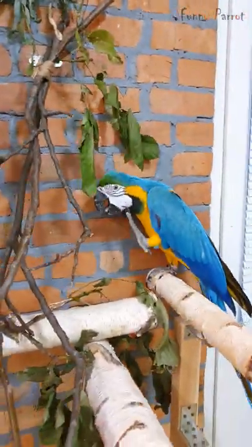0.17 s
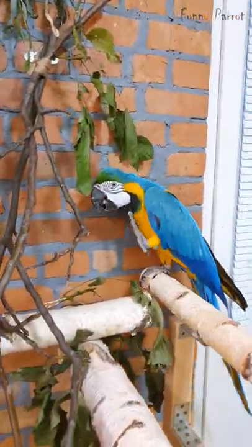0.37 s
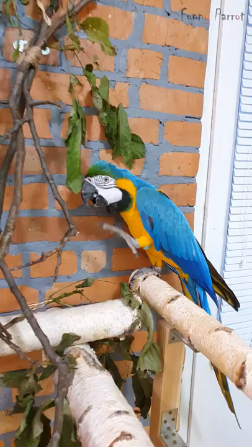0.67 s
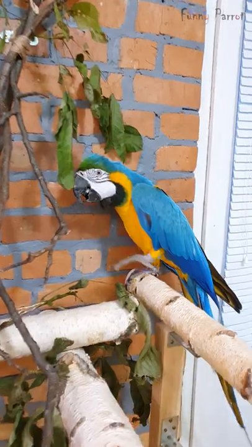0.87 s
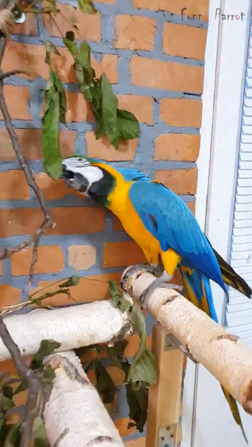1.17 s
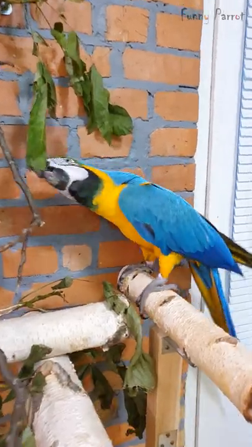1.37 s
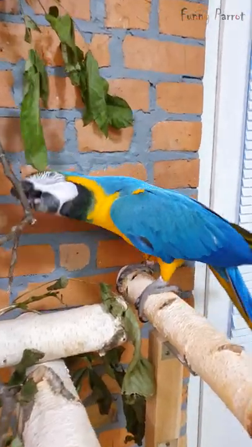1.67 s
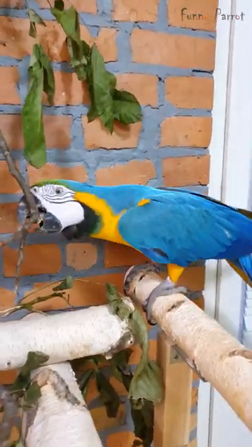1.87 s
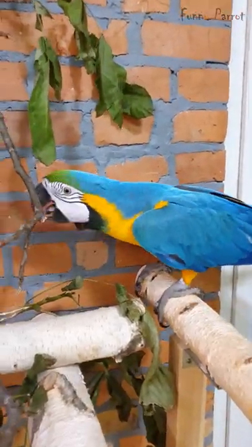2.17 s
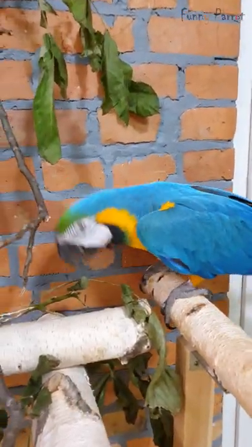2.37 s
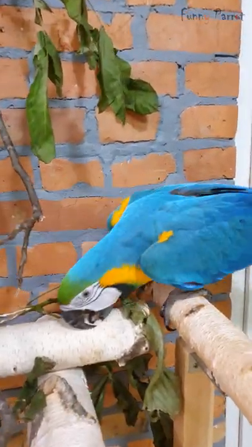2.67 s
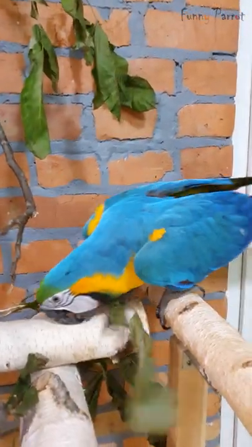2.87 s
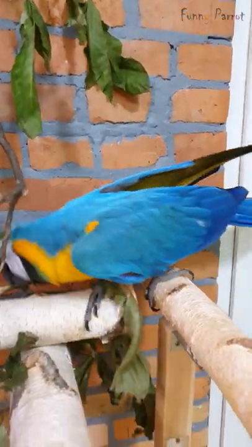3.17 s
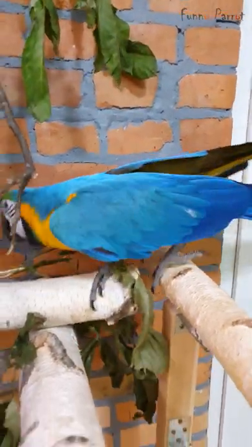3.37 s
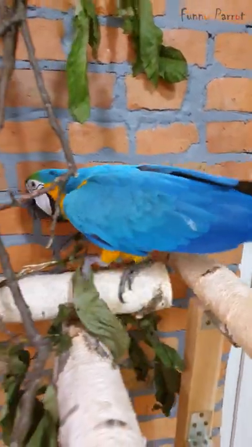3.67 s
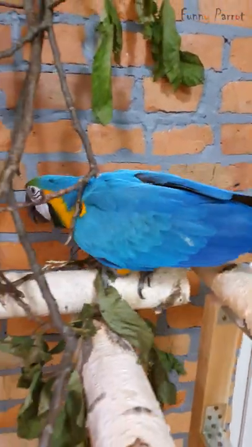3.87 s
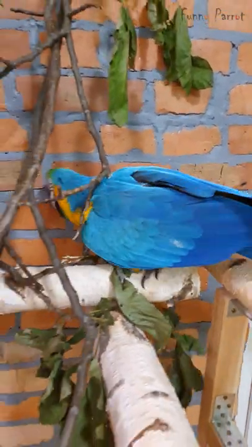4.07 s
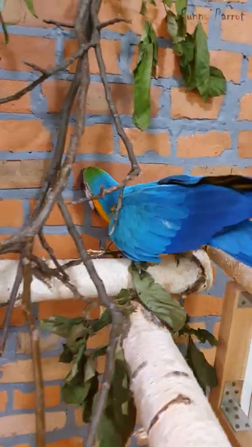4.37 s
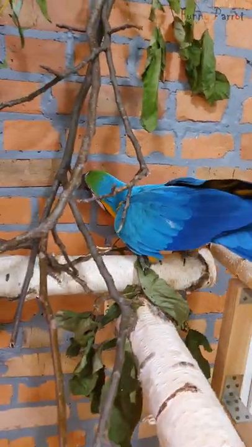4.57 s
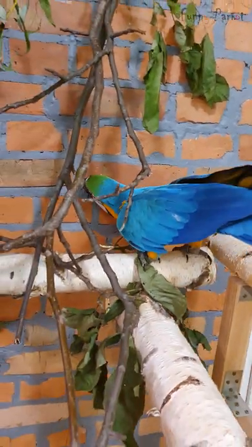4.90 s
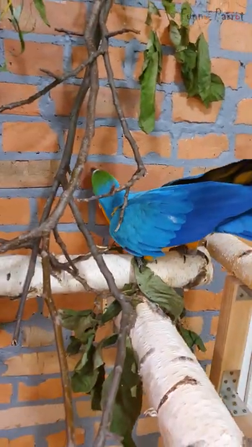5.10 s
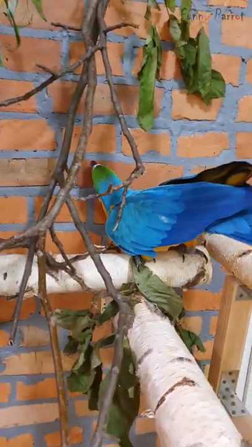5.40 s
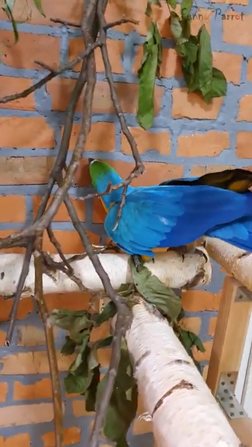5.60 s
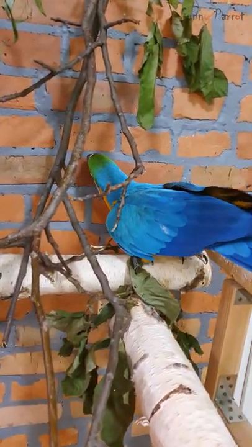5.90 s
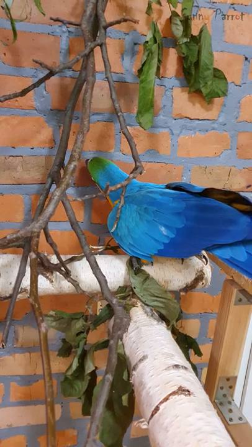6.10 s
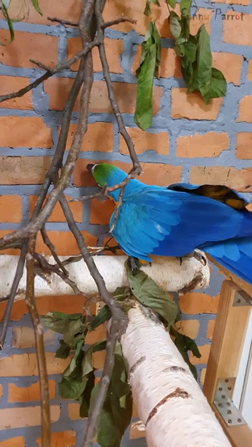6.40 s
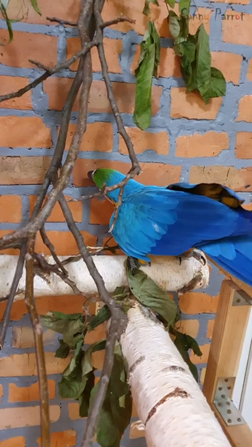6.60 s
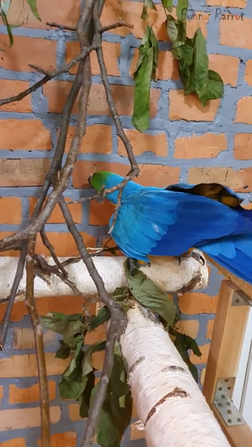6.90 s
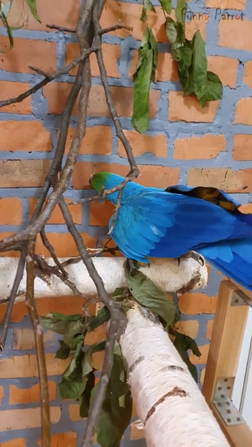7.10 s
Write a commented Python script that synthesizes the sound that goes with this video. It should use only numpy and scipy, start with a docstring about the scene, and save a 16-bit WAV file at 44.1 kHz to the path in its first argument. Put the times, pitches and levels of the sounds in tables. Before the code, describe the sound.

Close stereo pickup in a small, bright indoor room with a quiet mains hum. A big parrot clambers on a wooden perch with soft knocks and tiny beak cracks, squawks once loudly and harshly, then tugs a leafy branch in a dense flurry of rustling and brittle snapping, which thins into isolated crunches and blunt thuds.

```python
"""A macaw squawks twice and cracks twigs in its beak, while it clambers about a wooden perch in a brick room.
The squawks are rough tones shaped by a throat; the cracks are short noise bursts that ring.
It tugs a leafy branch close by, on the right: grains of noise rustle and twigs snap.
Soft knocks mark its steps, and dull thuds of low noise swell now and then over a mains hum."""
import sys
import numpy as np
from scipy import signal
from scipy.fft import rfft, irfft, next_fast_len
from scipy.io import wavfile
from scipy.ndimage import map_coordinates

SR = 44100
rng = np.random.default_rng(int(sys.argv[2]) if len(sys.argv) > 2 else 0)


def unload_wav(signal):
    """Save mono or channel-first audio to the path in sys.argv[1] as 16-bit WAV at rate SR, clipped to [-1, 1]."""
    wavfile.write(
        sys.argv[1],
        SR,
        np.round(np.clip(np.atleast_2d(signal).T, -1, 1) * 32767).astype(np.int16),
    )


N = 319725
TIME = np.arange(N) / SR  # seconds


def amp(db):
    """Turn decibels into a gain."""
    return 10 ** (np.asarray(db) / 20)


def unit(x):
    """Scale to an rms level of 1."""
    return x / np.sqrt(np.mean(x ** 2) + 1e-20)


def along(points, hz):
    """Read a curve of (Hz, value) points on a logarithmic frequency axis."""
    f, values = np.transpose(points)
    return np.interp(np.log(hz + 1), np.log(f), values)


def wobble(rate, size=N):
    """A smooth random curve with `rate` random points a second."""
    knots = rng.standard_normal(int(size * rate / SR) + 4)
    return map_coordinates(knots, [np.arange(size) * rate / SR])


def filtered(x, response):
    """Multiply the spectrum of x by a response that depends on frequency."""
    n = x.shape[-1]
    m = next_fast_len(n + 8192)  # spare room at the end
    spectrum = rfft(x, m) * response(np.fft.rfftfreq(m, 1 / SR))
    return irfft(spectrum, m)[..., :n]


def coloured(x, spectrum):
    """Give x the tone of a (Hz, dB) curve, at rms 1."""
    return unit(filtered(x, lambda hz: amp(along(spectrum, hz))))


def band(x, lo_hz, hi_hz, order=2):
    """Keep one band of frequencies, with a filter that never rings ahead of the sound."""
    edges = [lo_hz, min(hi_hz, SR / 2 - 100)]
    return signal.sosfilt(signal.butter(order, edges, "band", fs=SR, output="sos"), x)


def envelope(start, attack, hold, fall_db_per_s):
    """Loudness over time: a rise, a hold, then a steady fall in dB."""
    t = TIME - start
    fall = amp(-fall_db_per_s * np.maximum(t - attack - hold, 0))
    return np.clip(t / attack, 0, 1) * fall


def add(track, s, sound):
    """Mix a stereo sound into the track at time s."""
    start = round(s * SR)
    sound = sound[:, max(-start, 0):N - start]
    track[:, max(start, 0):][:, :sound.shape[1]] += sound


# How alike room sound is left and right. Each row: frequency in Hz, likeness from 0 to 1.
ALIKE = [(140, 0.94), (300, .75), (700, 0.4), (1400, 0), (16000, 0)]


def diffuse(pair):
    """Make two unrelated signals a room's sound: alike in the bass, unrelated in the treble."""
    def mid_and_side(hz):
        turn = np.arccos(np.clip(along(ALIKE, hz), -1, 1)) / 2
        return np.array([np.cos(turn), np.sin(turn)])
    mid, side = filtered(pair, mid_and_side)
    return np.array([mid + side, mid - side])


# How long the room's early fade lasts. Each row: frequency in Hz, time to fall by 60 dB in seconds.
ROOM = [(150, 0.35), (800, 0.55), (2000, 0.62), (3800, 0.56), (5500, 0.56), (10000, 0.46), (16000, 0.23)]


def in_room(x, wet_db, right_db, wall_db, lag):
    """Direct sound (lag seconds later on the left), a slap off the brick wall and the room's tail."""
    hz, t, grid = signal.stft(rng.standard_normal((2, int(.7 * SR))), SR, nperseg=256)
    build_up = 1 - np.exp(-t / 0.002)
    decay_db = -60 * t / along(ROOM, hz)[:, None]
    # the far end of the room gives its sound back slowly
    lingering = amp(0.78 * decay_db - 21.5)
    fade = build_up * np.hypot(amp(decay_db), lingering)
    tail = signal.istft(grid * fade, SR, nperseg=256)[1]
    paths = diffuse(tail) * amp(wet_db) / np.linalg.norm(tail[0])
    # direct sound, left then right: right_db is how much louder the right is
    paths[0, round(abs(lag) * SR)] += amp(-right_db / 2)
    paths[1, 0] += amp(right_db / 2)
    # the wall's slap, left then right
    paths[0, round(.0065 * SR)] += amp(wall_db)
    paths[1, round(.0069 * SR)] += amp(wall_db - 7.5)
    return signal.fftconvolve(x[None], paths, axes=1)


# Steady tones of the mains hum. Each row: frequency in Hz, level in dB.
HUM = [(120, -56.5), (180, -74.5), (240, -75.5), (345, -74)]
# Tone of the room's faint rush. Each row: frequency in Hz, relative level in dB per Hz.
AIR = [(25, -20.5), (60, -6), (80, 0), (105, -7), (150, -8.5), (190, -16), (340, -12.5), (420, -17.5),
       (600, -25.5), (1500, -26), (4000, -36), (6000, -47), (11000, -43.5), (16000, -71.5)]


def background():
    """Mains hum, tones that waver slightly in level, over the faint noise rush of the room."""
    hum = 0
    for hz, db in HUM:
        hum = hum + amp(db + 0.53 * wobble(4.4)) * np.sin(2 * np.pi * (hz * TIME + rng.random()))
    rush = coloured(diffuse(rng.standard_normal((2, N))), AIR)
    return hum + amp(-66.5) * rush


BOOM_ATTACK_S, BOOM_FALL_DB_PER_S = 0.12, 130.5
RUMBLE_ATTACK_S, RUMBLE_HOLD_S, RUMBLE_FALL_DB_PER_S = 0.084, 0.064, 84.5
# Tone of the rumble. Each row: frequency in Hz, relative level in dB per Hz.
DEEP = [(25, -17.5), (45, -13), (62, 1), (80, 5), (100, -18), (130, -37.5), (400, -120)]
# Tone of the boom. Each row: frequency in Hz, relative level in dB per Hz.
UPPER = [(90, -36.5), (125, 0.5), (150, 5), (185, -12), (260, -20), (450, -31.5), (800, -70.5),
         (2000, -120)]
# Dull thuds. Each row: start in seconds, hold of the boom in seconds, boom level in dB,
# rumble level in dB before a boost of 4.5 dB.
THUDS = [(2.278, 0.039, -52.5, -69), (2.945, 0.094, -51, -55.5), (4.578, 0.025, -48, -60),
         (4.665, 0.0088, -50, -69), (5.1, 0.015, -56, -79), (6.714, 0.024, -51.5, -76.5),
         (6.787, 0.033, -46, -53.5), (6.982, .03, -49, -60)]


def thuds():
    """Low, blunt thuds of noise: each begins as a boom, and a rumble swells as the boom lets go."""
    deep = coloured(diffuse(rng.standard_normal((2, N))), DEEP)
    upper = coloured(diffuse(rng.standard_normal((2, N))), UPPER)
    booms, rumbles = [], []
    for s, hold, boom_db, rumble_db in THUDS:
        booms.append(amp(boom_db) * envelope(s, BOOM_ATTACK_S, hold, BOOM_FALL_DB_PER_S))
        let_go = s + BOOM_ATTACK_S + hold
        swell = envelope(let_go, RUMBLE_ATTACK_S, RUMBLE_HOLD_S, RUMBLE_FALL_DB_PER_S)
        rumbles.append(amp(rumble_db) * swell)
    # overlapping thuds add as energies
    rumble = deep * np.linalg.norm(rumbles, axis=0) * amp(4.5)
    return rumble + upper * np.linalg.norm(booms, axis=0)


# Soft knocks of feet and beak on the perch. Each row: start in seconds,
# level in dB before a cut of 13 dB and the room, rough pitch in Hz.
STEPS = [(.82, -51, 410), (0.846, -51.5, 323), (1.811, -56.5, 314), (2.078, -64.5, 1110), (2.62, -55, 383),
         (2.82, -42.5, 707), (3.56, -47.5, 416), (4.071, -54.5, 857), (4.319, -55.5, 471), (6.62, -46, 910)]


def steps():
    """Soft, dull knocks on the wooden perch: fading noise in a narrow band around each pitch."""
    track, t = np.zeros((2, N)), np.arange(SR // 8) / SR
    for s, db, hz in STEPS:
        thump = rng.standard_normal(len(t)) * np.exp(-t / 0.028)
        knock = amp(db - 13) * unit(band(thump, hz / 1.5, hz * 1.2))
        add(track, s, in_room(knock, wet_db=2.0, right_db=4.5, wall_db=-15, lag=.0001))
    return track


def grains(rate, spread_db):
    """Tiny random contacts, about `rate` a second, of uneven strength."""
    hits = rng.random(N) < rate / SR
    strength = amp(spread_db * np.clip(rng.standard_normal(N), -2, 2))
    return hits * rng.choice([-1, 1], N) * strength


STROKE_ATTACK_S, STROKE_FALL_DB_PER_S = 0.02, 169.5  # the leaves settle after each stroke
# Tone of the scraping bark. Each row: frequency in Hz, relative level in dB per Hz.
SCRAPE = [(150, -23), (300, -20), (600, -8.5), (1000, -6), (1600, 1), (2700, 2), (4200, -0.5), (6000, -9),
          (9000, -16.5), (14000, -32.5)]
# Tone of the crinkling leaves. Each row: frequency in Hz, relative level in dB per Hz.
CRINKLE = [(2500, -33), (5000, -3.5), (7500, -5), (10300, 3), (13500, -1), (16000, -11.5)]
# Strokes of the bird against leaves and bark. Each row: start in seconds, hold in seconds,
# scrape level in dB before a cut of 0.5 dB, crinkle level in dB before a cut of 3 dB (both before the room).
STROKES = [(1.139, .01, -87, -76), (1.21, 0.12, -78.5, -74), (1.392, 0.08, -63, -71.5),
           (1.824, 0.082, -74.5, -76), (2.077, 0.22, -80, -85), (2.516, 0.2, -70, -62),
           (2.867, 0.23, -53.5, -54.5), (3.155, 0.078, -49, -52), (3.457, 0.072, -43, -46),
           (3.52, 0.049, -39.5, -37.5), (3.634, .14, -40.5, -36), (3.886, 0.049, -51.5, -54.5),
           (4.014, 0.15, -54, -59.5), (4.226, 0.092, -47.5, -50), (4.456, 0.23, -53, -56.5),
           (4.802, 0.025, -55, -64.5), (5.017, .03, -57.5, -61), (5.127, 0.019, -49.5, -69),
           (5.739, .08, -75, -83), (6.425, 0.19, -76, -83)]


def rustle():
    """Bark scrapes and dry leaves crinkle in clumps of tiny contacts with each stroke on the branch."""
    track = np.zeros((2, N))
    scrapes, crinkles = [], []
    for s, hold, scrape_db, crinkle_db in STROKES:
        shape = envelope(s, STROKE_ATTACK_S, hold, STROKE_FALL_DB_PER_S)
        scrapes.append(shape * amp(scrape_db))
        crinkles.append(shape * amp(crinkle_db))
    # the strongest stroke wins at each moment
    scraping, crinkling = np.max(scrapes, axis=0), np.max(crinkles, axis=0)
    for lag in (.00003, .00022):  # two sprays of the branch, in different directions
        clumps = amp(5 * wobble(70))
        scrape = coloured(clumps * grains(rate=550, spread_db=1.0), SCRAPE) * scraping * amp(-0.5)
        crinkle = coloured(clumps * grains(rate=810, spread_db=2), CRINKLE) * crinkling * amp(-3.0)
        track += in_room(scrape + crinkle, wet_db=-1, right_db=5.5, wall_db=-12.5, lag=lag)[:, :N]
    return track


# thin twigs ring high and favour the upper half of a crack's body, thick ones the lower half
EVEN_RING_HZ, TILT_DB_PER_OCTAVE = 2500, 4.5


def crack_bands(body_db, treble_db, ring_hz):
    """Low, middle and top level of a crack: the higher the twig rings, the more its body leans upward."""
    tilt_db = TILT_DB_PER_OCTAVE * np.log2(ring_hz / EVEN_RING_HZ)
    return [body_db - tilt_db, body_db + tilt_db, treble_db]


def fracture(levels_db, ring_hz, crunch, ring_width, splinter):
    """Wood fibres part in an uneven burst, fading over crunch seconds, that rings the twig."""
    t = np.arange(SR // 16) / SR
    fading = np.exp(-t / crunch) + splinter * np.exp(-t / 0.011)
    fibres = fading * amp(1.1 * wobble(900, len(t)))
    spectrum = rfft(fibres * rng.standard_normal(len(t)))
    # a brittle break excites all frequencies nearly evenly
    evened = irfft(spectrum / np.abs(spectrum) ** .5, len(t))
    burst = evened * np.exp(-t / (0.0028 + crunch))
    ring = unit(band(burst, ring_hz / (1 + ring_width), ring_hz * (1 + ring_width), order=1))
    low = unit(band(burst, 1100, 6700))
    middle = unit(band(burst, 2600, 6400))
    top = unit(band(burst, 7000, 14000))
    if ring_hz < 2500:
        low = unit(low + ring)
    else:
        middle = unit(middle + ring)
    # dividing by the root of the length makes the band levels energies
    return amp(levels_db) @ np.array([low, -middle, top]) / np.sqrt(len(t))


SNAP_CRUNCH_S = .0016
# a snapped twig whips back and strikes again, weaker, duller and lower
REBOUND_DB, REBOUND_TREBLE_DB, REBOUND_PITCH = -7, -11.5, .8
# Twigs snapping close by. Each row: start in seconds, body level in dB and treble level in dB
# (both before a tilt, a boost of 22 dB and the room), ring in Hz, wait before the rebound in seconds.
SNAPS = [(3.4652, -26, -36, 3280, .009), (3.537, -31, -34, 3650, .02), (3.5793, -30.5, -36, 2480, .009),
         (3.6556, -37, -40, 2250, .006), (3.716, -26.5, -23.5, 2150, .004), (3.7244, -31, -41, 1530, .004),
         (3.748, -47.5, -32.5, 1540, .005), (3.761, -31.5, -36.5, 2820, .005),
         (3.8024, -32, -21, 4070, .003), (3.8492, -45.5, -29.5, 4460, .005),
         (4.1612, -47.5, -53.5, 2100, .005), (4.406, -58, -42.5, 2436, .005),
         (4.4868, -28.5, -38, 2770, .0025), (4.528, -27, -39, 2430, .008), (4.6, -26.5, -49.5, 2500, .0058),
         (4.884, -33, -41.5, 3220, .003), (5.0449, -38.5, -52, 2320, .002), (5.083, -55.5, -72, 1580, .005)]


def snaps():
    """Twigs of the tugged branch snap close by, short and dry, and each rebounds once."""
    track = np.zeros((2, N))
    strikes = []
    for s, body_db, treble_db, ring_hz, after in SNAPS:
        strikes.append((s, body_db, treble_db, ring_hz))
        strikes.append((s + after, body_db + REBOUND_DB, treble_db + REBOUND_TREBLE_DB, ring_hz * REBOUND_PITCH))
    for s, body_db, treble_db, ring_hz in strikes:
        levels_db = crack_bands(body_db, treble_db, ring_hz)
        crack = fracture(levels_db, ring_hz, crunch=SNAP_CRUNCH_S, ring_width=0.051, splinter=0.23)
        add(track, s, in_room(amp(22.0) * crack, wet_db=-6, right_db=6.5, wall_db=-17.5, lag=.00003))
    return track


# Hollow of the beak, rung by every bite. Each row: frequency in Hz, width in Hz,
# gain in dB before a cut of 3 dB.
BEAK = [(845, 590, -2.5), (1570, 510, 2), (3870, 500, -4), (5520, 2300, -1)]
# Overall tone of the cracks in the beak. Each row: frequency in Hz, gain in dB.
BITE_COLOUR = [(700, 4.5), (1100, -1), (1700, -0.5), (2500, -1), (3500, -1.5), (5500, -0.5), (8000, -2.5),
               (11000, 2.5), (13000, -2.5), (16000, -2)]
# Twigs cracking in the beak. Each row: start in seconds, body level in dB and treble level in dB
# (both before a tilt, the beak, a boost of 27 dB and the room), ring in Hz, crunch in seconds.
BITES = [(.0704, -57.5, -56.5, 3600, .004), (.1276, -54, -56.5, 2730, .003),
         (.198, -49, -40.5, 4580, 0.002), (.225, -47.5, -59, 4100, 0.0047),
         (.5798, -63, -70.5, 2270, 0.0078), (.685, -57, -62, 2010, .018), (.6963, -55, -54.5, 4600, 0.0068),
         (1.4203, -64.5, -59.5, 2050, 0.0023), (1.4701, -64.5, -53, 1970, .0026),
         (1.5521, -63, -58, 4100, .004), (1.5823, -76, -73, 4070, .001), (1.649, -68, -80.5, 2060, .013),
         (1.8, -66, -77, 2000, 0.044), (2.1963, -71, -75.5, 2760, 0.0016), (2.3062, -71, -62, 4230, 0.0045),
         (2.504, -58, -54, 4670, 0.046), (2.826, -35.5, -38, 2760, .016), (2.869, -55, -39.5, 2773, 0.012),
         (3.2904, -59.5, -56, 1920, 0.012), (4.212, -57, -46, 3840, 0.006),
         (5.1427, -45, -45, 3044, 0.00084), (5.3259, -47.5, -45, 4720, 0.0013),
         (5.516, -62, -64, 4500, .001), (5.7291, -70, -72.5, 1695, .0025),
         (5.9156, -61.5, -66, 3660, .0079), (6.1282, -70.5, -71, 2000, .011),
         (6.1434, -68, -63, 4265, 0.0056), (6.3959, -60.5, -64.5, 3920, 0.0076),
         (6.6122, -43, -47, 4086, 0.0015), (6.6217, -45, -51, 3710, .006),
         (6.9787, -60.5, -85, 2230, .0004)]


def bites():
    """Each crack rings the beak; it works near the wall, so the room answers loudly."""
    track = np.zeros((2, N))
    for s, body_db, treble_db, ring_hz, crunch in BITES:
        levels_db = crack_bands(body_db, treble_db, ring_hz)
        crack = fracture(levels_db, ring_hz, crunch, ring_width=0.07, splinter=0.21)
        hollow = sum(amp(db - 3.0) * band(crack, hz - width / 2, hz + width / 2, order=1)
                     for hz, width, db in BEAK)
        bite = amp(27) * (0.77 * crack + hollow)
        add(track, s, in_room(bite, wet_db=7.0, right_db=12.5, wall_db=0.5, lag=.0003))
    return filtered(track, lambda hz: amp(along(BITE_COLOUR, hz)))


# Throat and open beak. Each row: frequency in Hz, gain in dB.
THROAT = [(300, -22), (750, -16.5), (1300, -7), (1800, -5.5), (2080, -7.5), (2450, -6), (3100, -4),
          (3550, 5.5), (4050, -0.5), (4450, -0.5), (4750, -7.5), (5500, -22.5), (6100, -10.5),
          (7500, -11.5), (16000, -28)]


def squawk(rows):
    """A whistle-like syrinx tone that turns harsh: it throbs, its period doubles, and it rasps."""
    s, *columns = np.transpose(rows)
    t = np.arange(s[0], s[-1], 1 / SR)
    pitch, db, rough = (np.interp(t, s, column) for column in columns)
    # a slow second oscillation of the membranes splits each partial into strands
    throb = np.sin(2 * np.pi * np.cumsum(124 * (1 + 0.07 * wobble(30, len(t)))) / SR)
    shake = .005 * wobble(120, len(t)) + rough * (.017 * wobble(250, len(t)) + .04 * throb)
    phase = 2 * np.pi * np.cumsum(pitch * (1 + shake)) / SR
    tone = 0
    for k, level_db in enumerate([-1.5, -7.0, -4.5, -19], 1):
        tone = tone + np.sin(k * phase) * amp(level_db + 7.7 * rough * wobble(200, len(t)))
    # partials halfway between the others: the doubled period
    halves = sum(np.sin((k - .5) * phase) for k in range(1, 5)) * wobble(400, len(t))
    # noise that pulses with each cycle of the tone
    rasp = rng.standard_normal(len(t)) * (1 + np.cos(phase))
    source = tone + 0.061 * rough * halves + (0.038 + 0.89 * rough ** 4) * rasp
    source = source * amp(5.9 * rough * np.roll(throb, SR // 500))  # loudness throbs 2 ms later
    voice = coloured(source, THROAT) * amp(db)
    return in_room(voice, wet_db=6.5, right_db=3.0, wall_db=-11.5, lag=.00006)


# The two squawks. Each row: time in seconds, pitch in Hz, level in dB before a cut of 3 dB and the room,
# roughness from 0 to 1.
FIRST_CALL = [(-.14, 1857, -48, 0.88), (-.04, 1825, -37, 0.54), (.03, 1810, -50, .3)]
SECOND_CALL = [(2.596, 1329, -49.5, 0.19), (2.619, 1453, -33.5, 0.29), (2.64, 1516, -40.5, .3),
               (2.659, 2052, -29, .3), (2.723, 1961, -20.5, .14), (2.745, 1878, -29, 0.82),
               (2.805, 1772, -28, .78), (2.88, 1881, -23.5, 0.62), (2.935, 1894, -49, .2)]


def calls():
    """The bird's two squawks; the first is already under way at the start."""
    track = np.zeros((2, N))
    for rows in (FIRST_CALL, SECOND_CALL):
        add(track, rows[0][0], amp(-3.0) * squawk(rows))
    return track


def scene():
    """The bird, its branch and the room."""
    return calls() + bites() + snaps() + steps() + rustle() + thuds() + background()


def record(dry):
    """Round off the tallest peaks and keep nothing above the band limit."""
    top_hz = 16200
    rounded = dry / (1 + (dry / .7) ** 4) ** (1 / 4)
    return filtered(rounded, lambda hz: hz < top_hz)


dry = scene()
out = record(dry)
unload_wav(out)
```